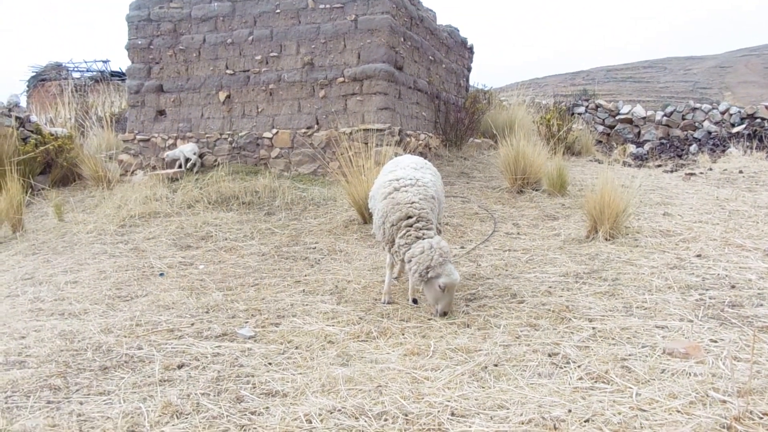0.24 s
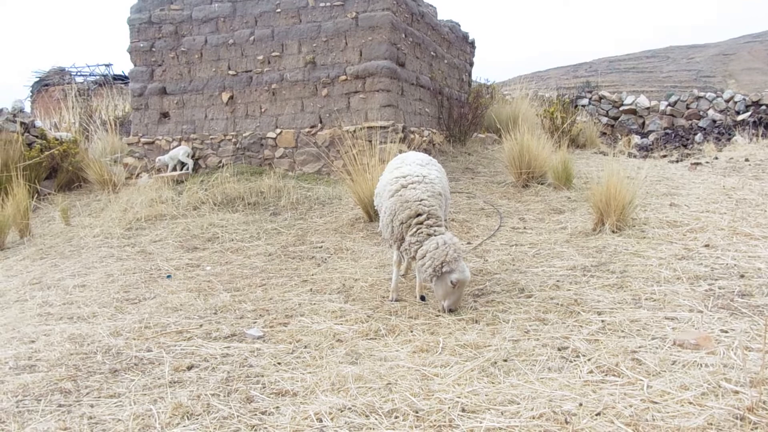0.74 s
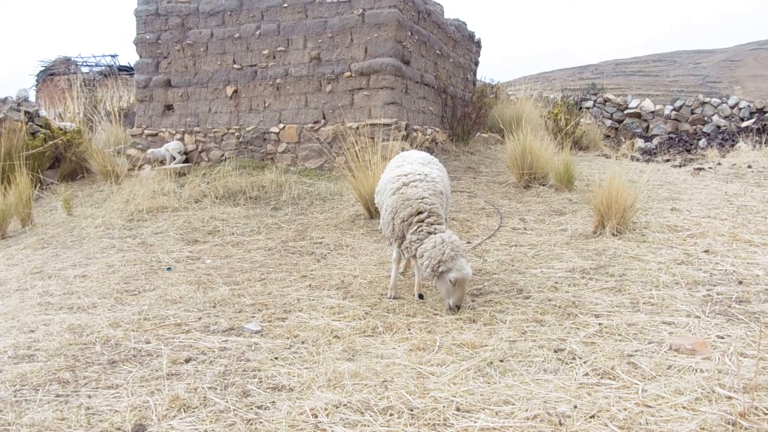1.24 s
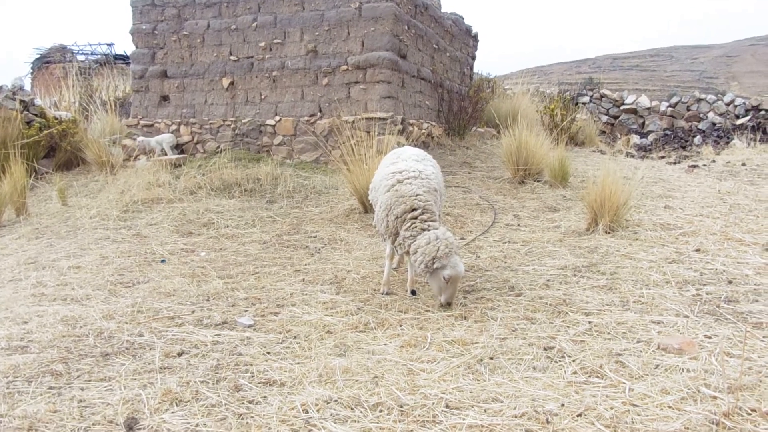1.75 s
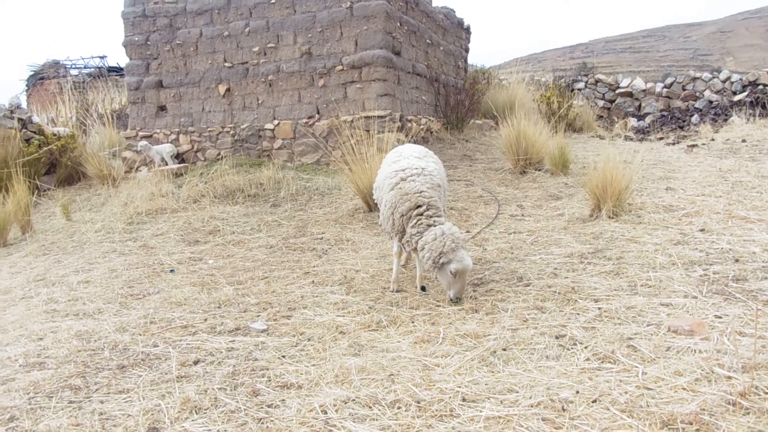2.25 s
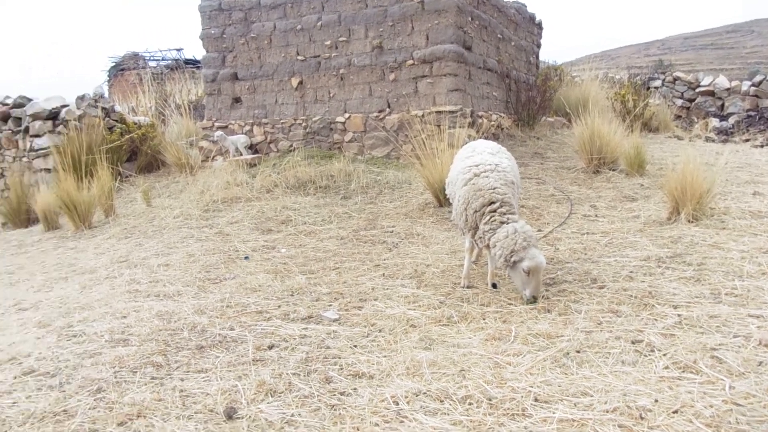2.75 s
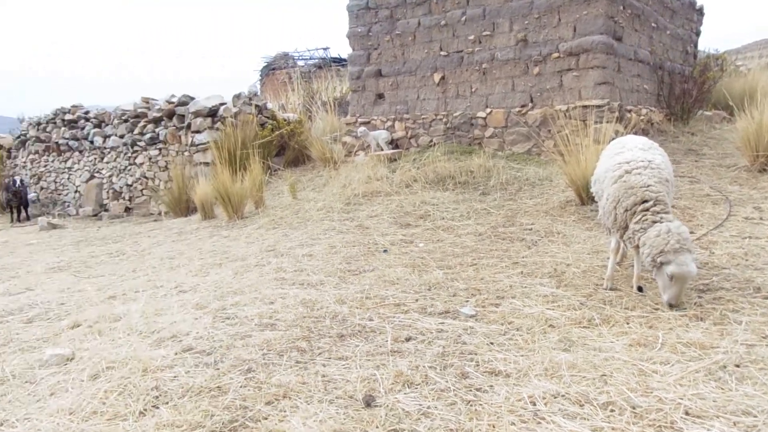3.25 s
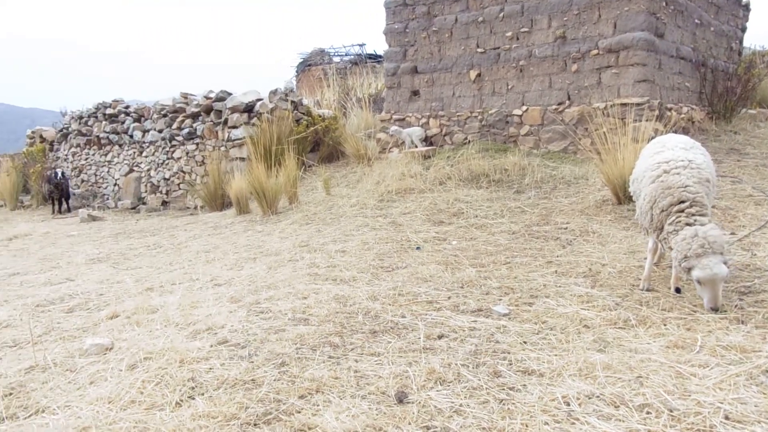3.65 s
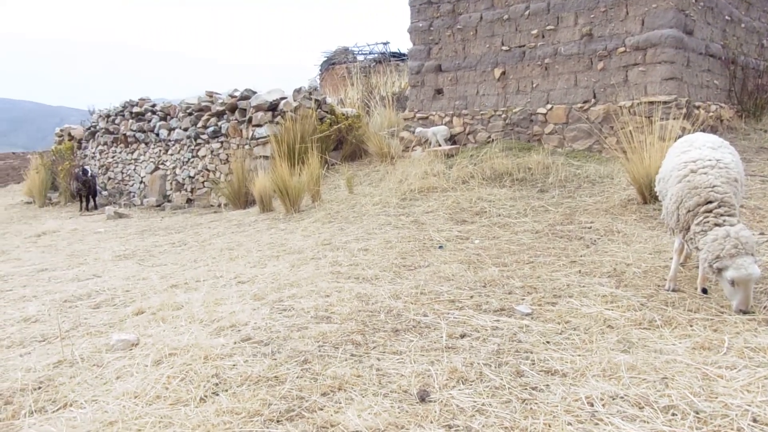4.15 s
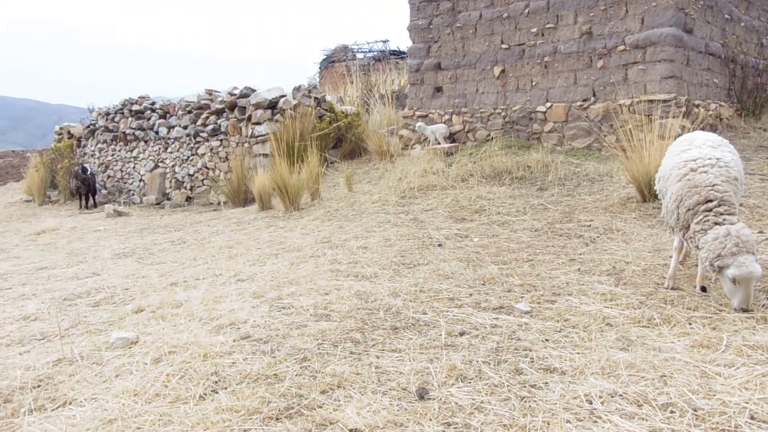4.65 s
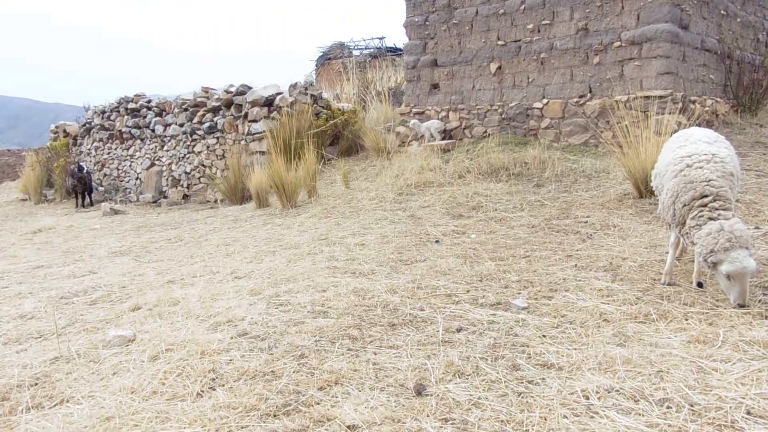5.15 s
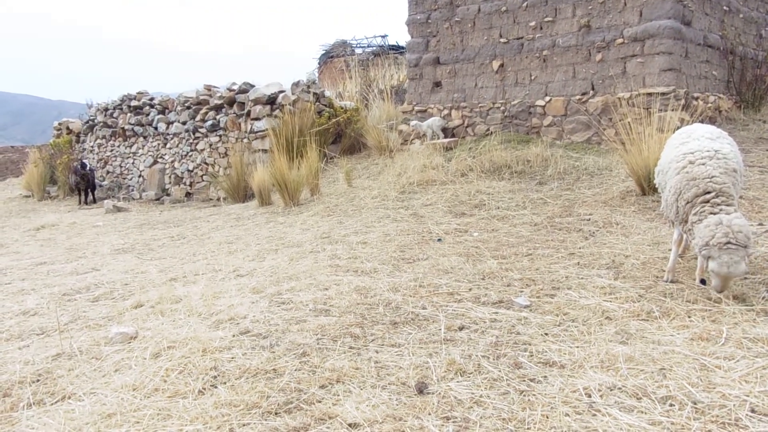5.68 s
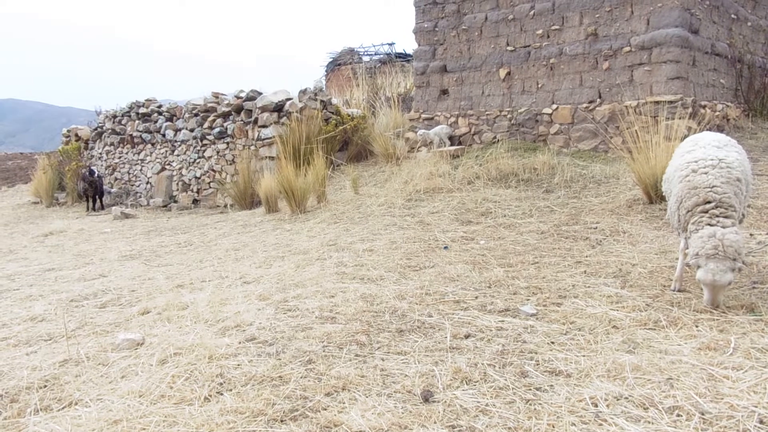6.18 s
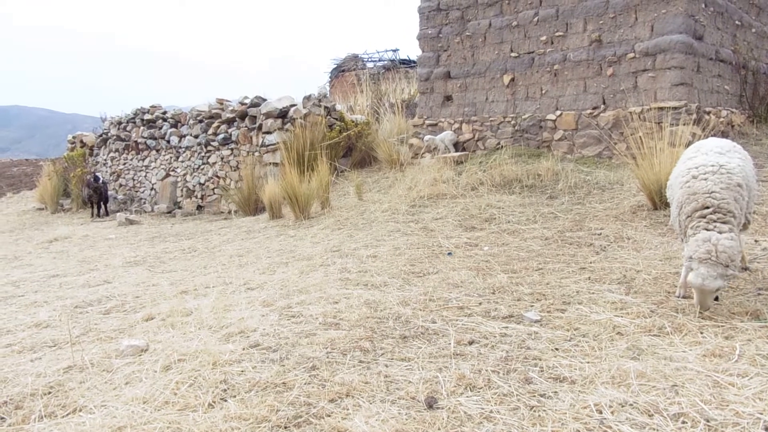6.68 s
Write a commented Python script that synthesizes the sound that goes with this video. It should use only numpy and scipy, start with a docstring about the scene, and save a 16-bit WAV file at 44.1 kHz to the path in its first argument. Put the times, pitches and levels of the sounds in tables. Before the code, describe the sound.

Soft outdoor hiss and breeze, with one tiny far chirp at the start. A young lamb bleats, clear and trembling, while a ewe answers in a low pulsing voice that goes from muffled to open. About a second and a half later comes the lamb's second, stronger bleat. Then only breeze remains, with soft microphone wind thumps and a couple of dry straw ticks. Open yard with faint wall reflections.

```python
"""A lamb bleats twice in a dry farmyard: pulse trains weighed by mouth resonances, with quavers in pitch and level.
A ewe answers the first bleat with a low throbbing call, mouth shut, then open; the yard echoes both animals.
Wind bumps the microphone (short low pulses with rumble), straw ticks (decaying sines), one far chirp sags in pitch.
Behind them: a breeze rustles (shaped noise) over steady hiss and a faint electrical hum (three sines)."""
import sys
import numpy as np
from scipy import signal
from scipy.io import wavfile
from scipy.ndimage import uniform_filter1d

SR = 44100
rng = np.random.default_rng(int(sys.argv[2]) if len(sys.argv) > 2 else 0)


def digitize_waveform(pressure):
    """Quantize a signal to 16-bit integers and store it at the path in sys.argv[1].

    Rows of a 2-D input are taken as channels; values are limited to [-1, 1].
    """
    field = np.atleast_2d(pressure).T
    bounded = np.clip(field, -1, 1)
    quanta = np.round(bounded * 32767).astype(np.int16)
    wavfile.write(sys.argv[1], SR, quanta)


N = 305172

# LAMB
# Articulation, one table a bleat: (time [s], effort [dB], jaw above effort [dB], tongue above effort [dB],
# palate above throat [dB], tongue [Hz], throat [Hz])
BLEAT_ROWS = [
    [(1.01, -71, 2, 4, -1, 2400, 3730), (1.075, -40, -1.5, -18, -2, 2350, 3730),
     (1.17, -32.5, -9, -9.5, -11.5, 2050, 3815), (1.23, -33.5, -11.5, -18.5, -11, 2220, 3750),
     (1.33, -36.5, -5.5, -10, -2.5, 2610, 3926), (1.44, -31.5, -7.5, -12.5, -10.5, 2540, 4010),
     (1.58, -37.5, 0, -5, 2, 2766, 3820), (1.65, -33.5, -3.5, -11, -14, 2530, 3820),
     (1.72, -34.5, -6, -7, -4.5, 2540, 3750), (1.77, -40.5, 0, 0, 1, 2440, 3600),
     (1.81, -44.5, -9, 1, 6.5, 2524, 3656), (1.832, -54, 21, 2, 0, 2492, 3563)],
    [(3.549, -61, 23, 13, -19, 2250, 3760), (3.57, -45.5, -1, -10, -22, 2300, 4010),
     (3.6, -34, -1.5, -8, 0, 1890, 4170), (3.66, -32.5, -1.5, -6.5, 0, 2180, 3750),
     (3.75, -25, -4, -12.5, -2.5, 2110, 3830), (3.87, -24.5, -6, -12.5, 0, 2100, 3980),
     (3.96, -24.5, -4.5, -9, -4.5, 1920, 3770), (4.12, -29, -2, -8, 4, 2160, 3660),
     (4.23, -28, -7.5, -10.5, -6.5, 1980, 3850), (4.3, -33, -12, -5.5, -5.5, 2100, 3720),
     (4.4, -30, -45, -10, -6, 2270, 3740), (4.46, -37.5, -8, -5.5, 2, 2080, 3560),
     (4.495, -48.5, -5, 3, 3, 2200, 3950), (4.515, -69, 20, -14, 6, 2100, 3800)],
]
# Pitch under the quavers, one table a bleat: (time [s], pitch [Hz])
BLEAT_PITCH = [
    [(1.01, 372), (1.045, 395), (1.09, 445.2), (1.17, 460.1), (1.45, 487.5), (1.52, 474.8), (1.6, 470.8),
     (1.7, 477.0), (1.75, 449), (1.79, 449), (1.835, 418)],
    [(3.545, 402), (3.6, 451.4), (3.69, 486.5), (3.77, 508.0), (3.88, 517.7), (3.99, 509.9), (4.1, 511.9),
     (4.2, 506.6), (4.28, 490.4), (4.46, 475.1), (4.495, 430.6), (4.515, 415)],
]
# Pitch creeps off and snaps back: (snap time [s], pitch rise [Hz], level change [dB])
QUAVER_ROWS = [(1.069, 19, 3.5), (1.146, 29.5, 2.5), (1.192, 9, -1.5), (1.24, 6, 2.5), (1.276, 13.5, 2),
               (1.322, 7.5, 3.5), (1.362, 10.5, 4), (1.403, 9, 4), (1.425, -6, -0.5), (1.487, 12, 1.5),
               (1.54, 10.5, 0), (1.578, 7, -1.5), (1.624, 9.5, 0.5), (1.72, 19.5, 1), (1.787, 8.5, -3),
               (3.671, 23.5, 1.5), (3.744, 14, -1), (3.916, 7, -2), (3.954, 7.5, -1.5), (4.058, -2.5, -2),
               (4.195, -5.5, 1), (4.39, 6, -1.5), (4.459, -7, 0.5)]
# Head setting, one row a bleat: (sheen above effort [dB], airy top above effort [dB], airy top width [Hz],
# nose above jaw [dB], palate [Hz], flutter [relative])
HEAD_ROWS = [(-18, -33, 700, -37, 4750, 0.39), (-23, -54, 2300, -15, 4813, 0.22)]
# Colour of the lowest partials: (frequency [Hz], gain [dB])
CHEST_GAIN = [(480, -8.5), (800, -19), (1300, 11), (2000, -67)]
# Colour of the highest partials: (frequency [Hz], gain [dB])
SHEEN_GAIN = [(4500, -12), (5700, -6.5), (6500, -2), (7400, -11), (8600, -35), (10500, -49), (11800, -28),
              (12500, -26), (13300, -41), (15000, -44)]
JAW_HZ, JAW_WIDTH_HZ = 1546, 560
NOSE_HZ, NOSE_WIDTH_HZ = 1090, 86
TONGUE_WIDTH_HZ, THROAT_WIDTH_HZ, PALATE_WIDTH_HZ = 785, 286, 840
CHEST_ABOVE_EFFORT_DB = -21.5
CHEST_SHARE, FULL_VOICE_DB = 0.55, -28  # chest takes this share of the effort's distance from full voice
AIRY_HZ, AIRY_FADE_DB_PER_HZ = 12500, 1.5  # fades as pitch lies below its highest
CATCH_DB, CATCH_DELAY_S, CATCH_HALF_S = -1, 0.017, 0.0056  # voice catches just after each snap

# EWE
# Call between throbs: (time [s], pitch [Hz], open mouth level [dB])
EWE_ROWS = [(1.2, 160, -76), (1.379, 175.2, -66), (1.61, 182.2, -61), (1.63, 183.4, -41),
            (1.68, 180.6, -43), (1.75, 181.2, -37.5), (1.95, 176.8, -39), (1.989, 170.5, -38),
            (2.026, 168.8, -48), (2.063, 160.5, -61)]
# Throbs: (time [s], half length [s], pitch jump [Hz], nasal hum level [dB], mouth gain [dB])
THROB_ROWS = [(1.23, 0.021, 4, -59, 5), (1.313, 0.023, 3.16, -71, 7), (1.39, 0.013, 20, -54, 9),
              (1.468, 0.027, 18, -48, 14), (1.552, 0.015, 27.2, -43.5, 15), (1.629, 0.014, 30, -43.5, 9),
              (1.697, .017, 24, -51, 12.5), (1.773, .016, 32, -49.5, 7.5), (1.841, 0.023, 34.1, -49.5, 7.5),
              (1.913, 0.015, 29.2, -50, 8)]
# Lower mouth resonances: (frequency [Hz], width [Hz], level [dB])
EWE_LOW_PEAKS = [(1210, 177, -24), (2005, 260, -5), (2740, 370, -7.5), (3380, 630, -20)]
# Upper mouth resonances: (frequency [Hz], width [Hz], level [dB])
EWE_HIGH_PEAKS = [(2963, 130, 0.5), (3675, 180, -10.5), (4240, 210, -16.5)]
# Return off the ground, near as the ewe grazes: (time [s], share of the direct sound [ratio])
GROUND_SHARE = [(1.6, 0.52), (1.88, 0.96), (1.95, 0.44), (2.06, 0.29)]
GROUND_DELAY_S = 0.001422
NASAL_BETWEEN_THROBS_DB = -65
OPEN_S, WIDEN_S = 1.625, 0.2  # mouth opens, then widens over this time
LIP_SHUT_HZ, LIP_WIDE_HZ, LIP_WIDTH_HZ, LIP_ABOVE_MOUTH_DB = 650, 842, 220, -8
BRIGHT_SHUT_DB, BRIGHT_WIDE_DB = -18, -6.5
CLOSE_S, CLOSE_BRIGHT_DB_PER_S, CLOSE_LIP_DB_PER_S = 1.96, 146, -120  # closing thins: brighter, less lip

# YARD AND BACKGROUND
ECHO_DB, ECHO_T60_S, ECHO_GAP_S = -24, 0.3, 0.012
# Wind bumps: (middle [s], peak [dB], frequency [Hz])
BUMP_ROWS = [(3.72, -58, 32), (3.815, -59, 55), (3.868, -43.5, 88), (3.935, -55, 70), (4.2, -66, 35),
             (4.39, -58, 40), (4.521, -50, 50), (5.66, -60, 48), (5.93, -58, 40), (6.58, -50, 45),
             (6.86, -56, 40)]
# Straw ticks: (start [s], starting level [dB], frequency [Hz], 60 dB decay time [s])
TICK_ROWS = [(2.939, -38, 2420, 0.006), (5.655, -35.5, 1350, 0.014), (5.759, -57, 802, 0.006)]
CHIRP_S, CHIRP_RISE_S, CHIRP_FALL_S, CHIRP_DB = 0.6, 0.025, 0.025, -54  # loudest moment, time constants, peak
CHIRP_HZ, CHIRP_SAG_HZ_PER_S = 1950, 4200
WIND_BED_DB, WIND_BED_START_S = -76, 4.7
GUST_ABOVE_BUMP_DB, GUST_HALF_S = -16.5, 0.073
# Breeze rustle: (time [s], level [dB])
BREEZE_LEVEL = [(0, -60), (.4, -62), (.6, -56), (.9, -59.5), (1.5, -53), (2.6, -60.5), (3.3, -58.5),
                (4.0, -59.5), (4.8, -61), (5.3, -57), (5.8, -60), (6.92, -61.5)]
# Spectrum of the rustle: (frequency [Hz], gain [dB])
BREEZE_GAIN = [(150, -4.5), (350, -3), (700, -1), (1300, -2.5), (2600, -6.5), (5000, -21.5)]
# Spectrum of the steady hiss: (frequency [Hz], relative density [dB])
HISS_GAIN = [(12, -49), (20, -19), (32, -20), (49, -24.5), (90, -14), (126, -2), (149, -26), (171, -4.5),
             (208, 1), (245, 0.5), (650, 0), (2280, -2.5), (4700, -3.5), (15600, -15)]
HISS_DB = -55
# Electrical hum: (frequency [Hz], RMS level [dB])
HUM_ROWS = [(59.2, -77.5), (118.4, -74), (177.6, -75)]
BAND_EDGE_HZ = 15740


def gain_of(db):
    """Amplitude factor of a level in dB."""
    return 10 ** (np.asarray(db) / 20)


def evened(x):
    """Scale to unit RMS."""
    return x / np.sqrt(np.mean(abs(x) ** 2) + 1e-20)


def read(points, hz):
    """Read a spectrum table on a log frequency axis."""
    f, value = np.transpose(points)
    return np.interp(np.log(hz + 1), np.log(f + 1), value)


def curves(rows, t):
    """Interpolate every column of a time table."""
    s, *columns = np.transpose(rows)
    return [np.interp(t, s, column) for column in columns]


def add(mix, start_s, sound):
    """Mix a sound in place."""
    part = mix[round(start_s * SR):][:len(sound)]
    part += sound[:len(part)]


def peak(hz, centre_hz, width_hz, steep):
    """Complex gain of a resonance, 1 at its centre."""
    return (1 + 2j * (hz - centre_hz) / width_hz) ** -steep


def complex_drift(length, size_1, size_2):
    """Twice-smoothed complex noise of unit RMS."""
    noise = uniform_filter1d(rng.standard_normal((2, length)), size=size_1)
    real, imag = uniform_filter1d(noise, size=size_2)
    return evened(real + 1j * imag)


def voice(pitch_hz, colour, rough, flutter, jitter, count):
    """Partials of a pulse train, weighed by colour(Hz), each fluttering on its own and blurred by breath."""
    length = len(pitch_hz)
    wobble = evened(uniform_filter1d(rng.standard_normal(length), size=200))
    pitch_hz = pitch_hz * (1 + jitter * wobble)
    turns = np.cumsum(pitch_hz) / SR
    out = np.zeros(length)
    for k in range(1, count + 1):
        # breath blurs the upper partials most
        breath = rough * (0.07 + 1.25 * k / 9 if k < 9 else 1) * complex_drift(length, 50, 40)
        slow = flutter * min(k / 6, 1.2) * complex_drift(length, 900, 500)
        waver = 1 + breath + slow
        out += (colour(k * pitch_hz) * waver * np.exp(2j * np.pi * k * turns)).real
    return np.sqrt(2) * out * signal.windows.tukey(length, 0.03)


def lamb(pitch_rows, rows, head):
    """Thin clear voice through head resonances; tongue and throat shift, each quaver roughens it."""
    t = np.arange(rows[0][0], rows[-1][0], 1 / SR)
    hz, = curves(pitch_rows, t)
    sheen_db, airy_db, airy_width_hz, nose_db, palate_hz, flutter = head
    effort_db, jaw_db, tongue_db, lean_db, tongue_hz, throat_hz = curves(rows, t)
    airy_db = airy_db - AIRY_FADE_DB_PER_HZ * (hz.max() - hz)

    swell_db = np.zeros(len(t))
    rough = np.full(len(t), 0.062)
    for s, rise_hz, db in QUAVER_ROWS:
        creep = np.exp(-abs(t - s) / 0.025)
        snap = np.exp(-((t - s) / 0.009) ** 2)
        shape = np.where(t < s, creep, snap)
        catch = np.exp(-((t - s - CATCH_DELAY_S) / CATCH_HALF_S) ** 2)
        hz = hz + rise_hz * shape
        swell_db = swell_db + db * shape + CATCH_DB * catch
        rough = rough + 0.008 * abs(rise_hz) * np.exp(-((t - s - 0.005) / 0.011) ** 2)

    chest_db = FULL_VOICE_DB + CHEST_SHARE * (effort_db - FULL_VOICE_DB) + CHEST_ABOVE_EFFORT_DB
    chest = gain_of(chest_db)
    jaw, tongue = gain_of(effort_db + jaw_db), gain_of(effort_db + tongue_db)
    throat, palate = gain_of(effort_db - lean_db / 2), gain_of(effort_db + lean_db / 2)
    sheen, airy = gain_of(effort_db + sheen_db), gain_of(effort_db + airy_db)

    def colour(f):
        """Alternating signs among jaw, tongue, throat and palate."""
        nose_peak = gain_of(nose_db) * peak(f, NOSE_HZ, NOSE_WIDTH_HZ, steep=0.74)
        return (jaw * (peak(f, JAW_HZ, JAW_WIDTH_HZ, steep=2.24) + nose_peak)
                - tongue * peak(f, tongue_hz, TONGUE_WIDTH_HZ, steep=1.83)
                + throat * peak(f, throat_hz, THROAT_WIDTH_HZ, steep=1.51)
                - palate * peak(f, palate_hz, PALATE_WIDTH_HZ, steep=2.32)
                + chest * gain_of(read(CHEST_GAIN, f))
                + sheen * gain_of(read(SHEEN_GAIN, f))
                + airy * peak(f, AIRY_HZ, airy_width_hz, steep=2.5))

    bleat = voice(hz, colour, rough, flutter=flutter, jitter=0.0014, count=30)
    return t[0], gain_of(swell_db) * bleat


def ewe():
    """Each throb lifts pitch and effort; the nose hums the fundamental, the opened mouth adds the buzz."""
    t = np.arange(EWE_ROWS[0][0], EWE_ROWS[-1][0], 1 / SR)
    hz, mouth_db = curves(EWE_ROWS, t)
    wide = np.clip((t - OPEN_S) / WIDEN_S, 0, 1)
    closing_s = np.maximum(t - CLOSE_S, 0)
    lip_hz = LIP_SHUT_HZ + (LIP_WIDE_HZ - LIP_SHUT_HZ) * wide
    lip_db = mouth_db + LIP_ABOVE_MOUTH_DB + CLOSE_LIP_DB_PER_S * closing_s  # untouched by the throbs
    bright_db = BRIGHT_SHUT_DB + (BRIGHT_WIDE_DB - BRIGHT_SHUT_DB) * wide + CLOSE_BRIGHT_DB_PER_S * closing_s

    nasal = gain_of(NASAL_BETWEEN_THROBS_DB) * np.ones(len(t))
    rough = np.full(len(t), 0.05)
    for s, half_s, jump_hz, nasal_db, db in THROB_ROWS:
        hz = hz + jump_hz * np.exp(-((t - s) / half_s) ** 8)
        shape = np.exp(-((t - s) / (0.98 * half_s)) ** 2)
        mouth_db = mouth_db + db * shape
        nasal = nasal + gain_of(nasal_db) * shape
        rough = rough + 0.08 * shape

    ground, = curves(GROUND_SHARE, t)
    mouth, lips, bright = gain_of([mouth_db, lip_db, bright_db])

    def mouth_peaks(f, rows, steep):
        """Resonances in alternating sign."""
        return sum((-1) ** k * gain_of(db) * peak(f, centre_hz, width_hz, steep)
                   for k, (centre_hz, width_hz, db) in enumerate(rows))

    def colour(f):
        """Nose, lips and mouth; the ground return combs the lower mouth peaks."""
        low = mouth_peaks(f, EWE_LOW_PEAKS, steep=1.44)
        high = mouth_peaks(f, EWE_HIGH_PEAKS, steep=1.8)
        comb = 1 + ground * np.exp(-2j * np.pi * f * GROUND_DELAY_S)
        return (nasal * peak(f, 203, 91, steep=1.1)
                - lips * peak(f, lip_hz, LIP_WIDTH_HZ, steep=2.0)
                + mouth * (low * comb + bright * high))

    return t[0], voice(hz, colour, rough, flutter=0.1, jitter=0.004, count=28)


def yard(x):
    """Walls and slope return a short, dull scatter of echoes: decaying low-passed noise as impulse response."""
    t = np.arange(SR // 2) / SR
    tail = rng.standard_normal(len(t)) * gain_of(-60 * t / ECHO_T60_S) * (t > ECHO_GAP_S)
    tail = signal.lfilter(*signal.butter(1, 3000, fs=SR), tail)
    return gain_of(ECHO_DB) * signal.fftconvolve(x, tail / np.linalg.norm(tail))[:N]


def wind_bumps():
    """Wind bumps on the microphone: low cosine pulses of a cycle or two."""
    out = np.zeros(N)
    lead_s = 0.04
    u = np.arange(4000) / SR - lead_s
    for s, db, hz in BUMP_ROWS:
        bell = np.exp(-(u * hz / 0.36) ** 2)
        add(out, s - lead_s, -gain_of(db) * bell * np.cos(2 * np.pi * hz * u))
    return out


def straw_ticks():
    """Straw ticks: sines that die away in milliseconds."""
    out, t = np.zeros(N), np.arange(4000) / SR
    for s, db, hz, t60_s in TICK_ROWS:
        add(out, s, gain_of(db - 60 * t / t60_s) * np.sin(2 * np.pi * hz * t))
    return out


def far_chirp():
    """One far chirp: a sine that swells, fades and sags in pitch."""
    out, t = np.zeros(N), np.arange(4000) / SR
    u = t - t[-1] / 2
    swell = np.exp(-abs(u) / np.where(u < 0, CHIRP_RISE_S, CHIRP_FALL_S)) * np.hanning(len(u))
    turns = np.cumsum(CHIRP_HZ - CHIRP_SAG_HZ_PER_S * u) / SR
    add(out, CHIRP_S + u[0], gain_of(CHIRP_DB) * swell * np.sin(2 * np.pi * turns))
    return out


def wind_rumble():
    """Low band noise swelling around every bump, over a bed that starts once the wind picks up."""
    t = np.arange(N) / SR
    level = gain_of(WIND_BED_DB) * (t > WIND_BED_START_S)
    for s, db, _ in BUMP_ROWS:
        level = level + gain_of(db + GUST_ABOVE_BUMP_DB) * np.exp(-((t - s) / GUST_HALF_S) ** 2)
    band = signal.butter(2, [12, 55], "band", fs=SR, output="sos")
    return level * evened(signal.sosfilt(band, rng.standard_normal(N)))


def shaped_noise(gain_db):
    """Random complex spectra, weighed by gain_db and overlap-added to unit RMS noise."""
    real, imag = rng.standard_normal((2, 513, N // 256 + 5))
    spectra = (real + 1j * imag) * gain_of(gain_db)
    return evened(signal.istft(spectra, nperseg=1024, noverlap=768)[1][:N])


def breeze():
    """Rustling mid-band noise, patchy in time and frequency, that follows the breeze."""
    hz = np.fft.rfftfreq(1024, 1 / SR)[:, None]
    patches = rng.standard_normal((513, N // 256 + 5))
    patches = uniform_filter1d(patches, size=10, axis=0)
    patches = evened(uniform_filter1d(patches, size=12, axis=1))
    level_db, = curves(BREEZE_LEVEL, np.arange(N) / SR)
    return gain_of(level_db) * shaped_noise(read(BREEZE_GAIN, hz) + 0.66 * patches)


def hiss():
    """Steady noise of fixed spectrum."""
    hz = np.fft.rfftfreq(1024, 1 / SR)[:, None]
    return gain_of(HISS_DB) * shaped_noise(read(HISS_GAIN, hz))


def electrical_hum():
    """A faint electrical hum and its overtones, at random phases."""
    t = np.arange(N) / SR
    return sum(np.sqrt(2) * gain_of(db) * np.sin(2 * np.pi * (hz * t + rng.random())) for hz, db in HUM_ROWS)


def scene():
    """Both animals with their echoes, over wind, small sounds and background."""
    flock = np.zeros(N)
    for bleat in zip(BLEAT_PITCH, BLEAT_ROWS, HEAD_ROWS):
        add(flock, *lamb(*bleat))
    add(flock, *ewe())
    small_sounds = wind_bumps() + straw_ticks() + far_chirp()
    background = wind_rumble() + breeze() + hiss() + electrical_hum()
    return (flock + yard(flock) + small_sounds + background)[None]


def record(dry):
    """Steep linear-phase low-pass: the band limit of the recorder."""
    lowpass = signal.firwin(1023, BAND_EDGE_HZ, window=("kaiser", 9), fs=SR)
    return signal.oaconvolve(dry, lowpass[None], "same")


dry = scene()
out = record(dry)
digitize_waveform(out)
```